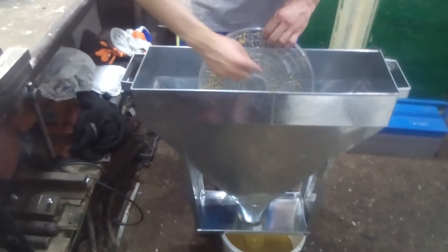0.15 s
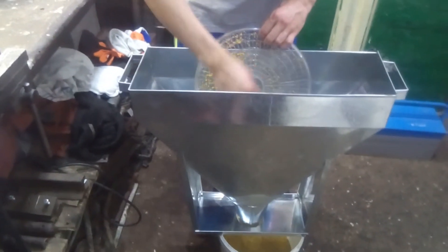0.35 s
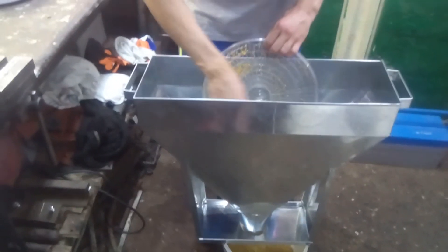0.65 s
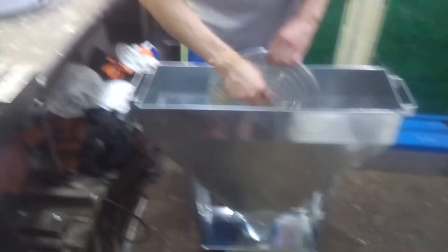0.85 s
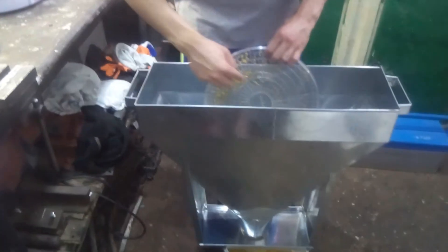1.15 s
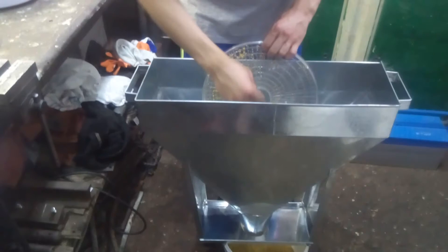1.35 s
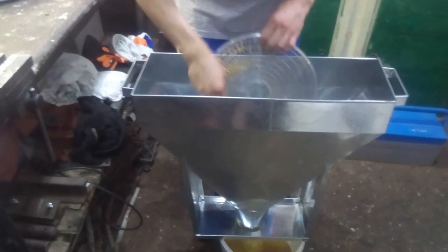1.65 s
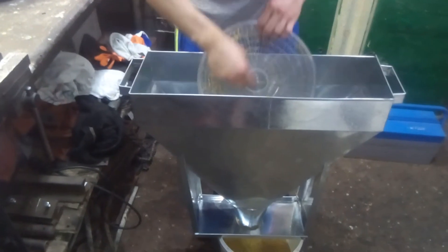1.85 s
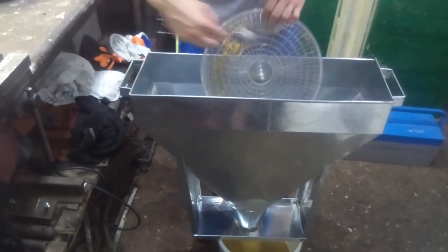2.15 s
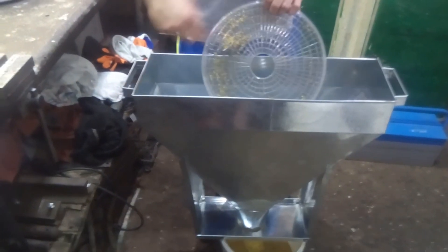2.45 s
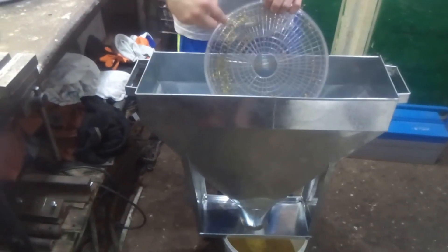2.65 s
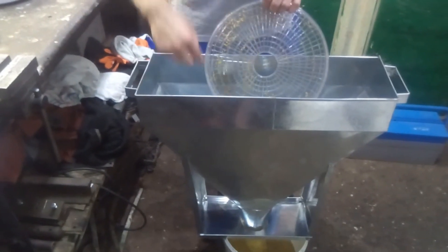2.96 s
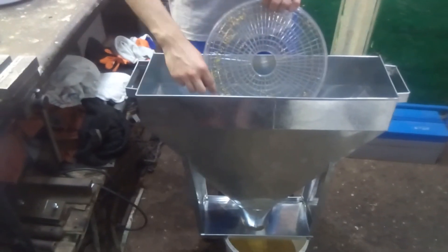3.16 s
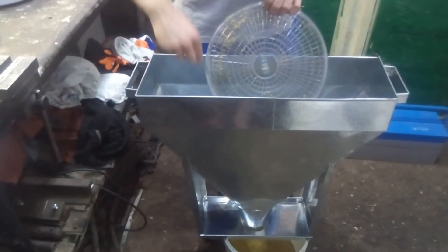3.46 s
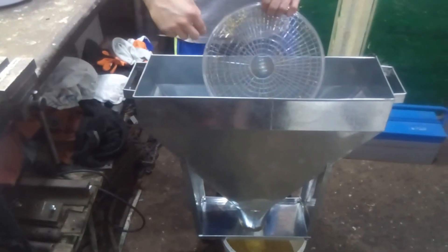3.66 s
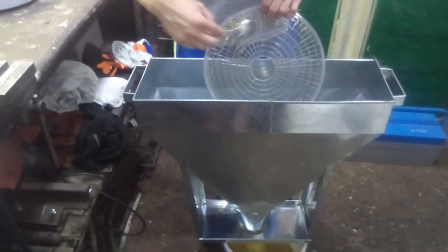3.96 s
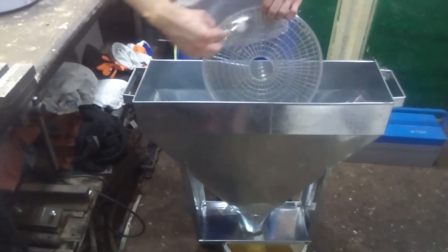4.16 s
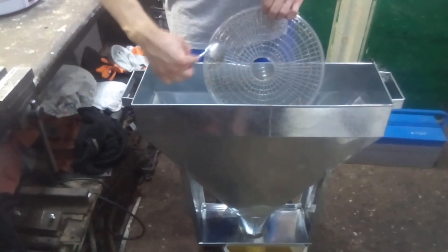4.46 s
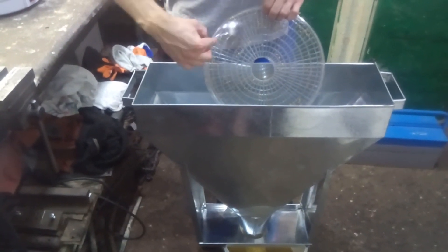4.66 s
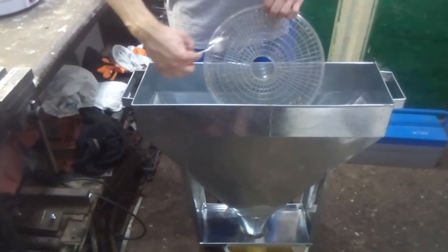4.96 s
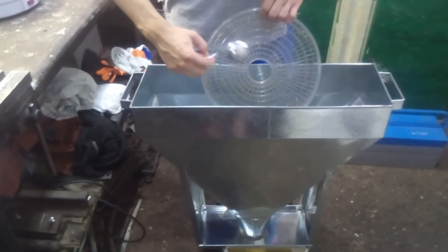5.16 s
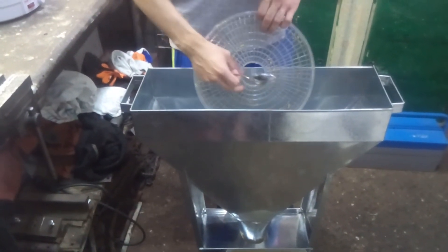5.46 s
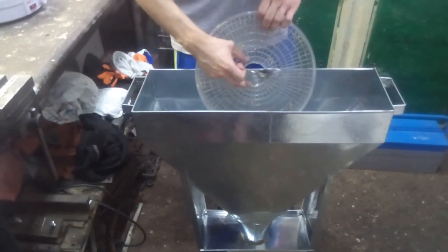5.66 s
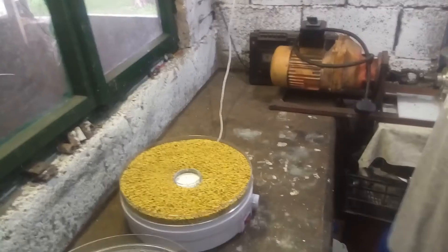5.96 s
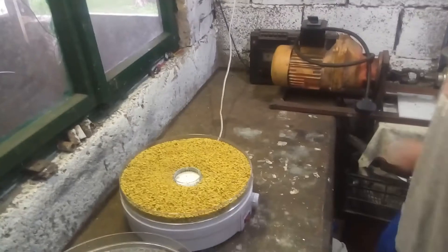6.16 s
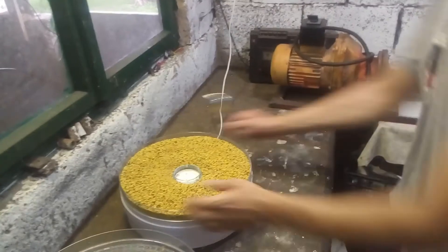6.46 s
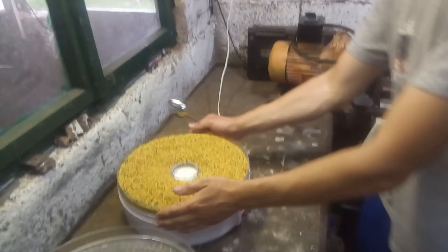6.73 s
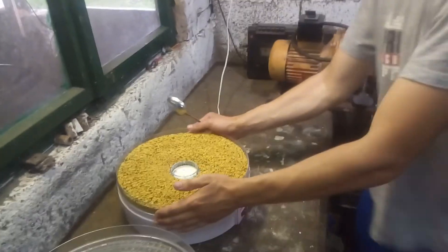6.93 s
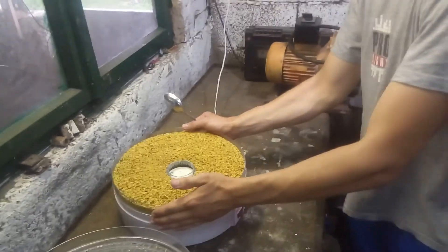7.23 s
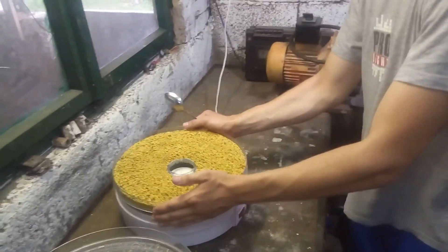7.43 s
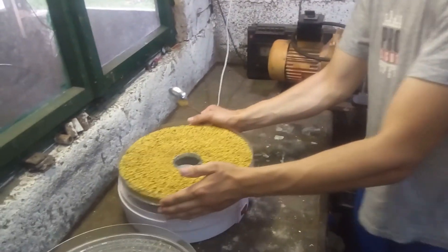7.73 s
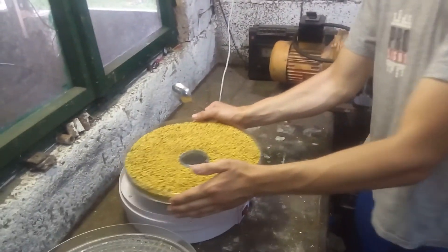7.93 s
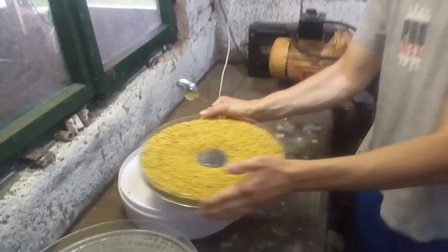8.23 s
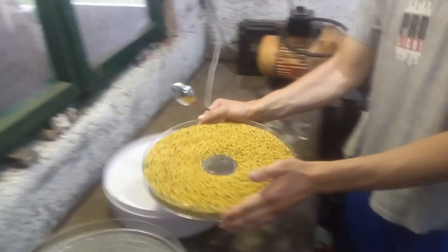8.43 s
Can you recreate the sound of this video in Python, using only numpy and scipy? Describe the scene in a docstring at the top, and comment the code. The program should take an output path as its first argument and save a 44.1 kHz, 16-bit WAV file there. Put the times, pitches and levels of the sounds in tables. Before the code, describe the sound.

Dry pellets scraped off a plastic tray hiss and rattle into a sheet-metal hopper, then an abrupt cut to a spoon clacking on a bench.

```python
"""Pellets into a hopper, then a spoon dropped in a shed

Random tiny impacts excite sheet-metal resonances: dry pellets, scraped off a plastic tray, pour in surges.
After a cut, decaying noise bursts and struck modes make a spoon dropped on a bench; filtered friction noise
makes hands on a stack of trays; pulsed tone makes a cricket on the left; an exponential wash gives the shed.
Steady hiss and a thin left-hand whine, jumping in pitch, run throughout; two spaced microphones differ in colour."""
import sys
import numpy as np
from scipy import signal
from scipy.fft import rfft, irfft
from scipy.io import wavfile
from scipy.ndimage import uniform_filter1d

SR = 44100
rng = np.random.default_rng(int(sys.argv[2]) if len(sys.argv) > 2 else 0)


def level_to_linear(level):
    """Convert decibel levels to linear amplitude factors, elementwise."""
    exponent = np.asarray(level, float) / 20
    return 10 ** exponent


def inscribe(sig):
    """Save sig as 16-bit PCM at rate SR to the path in sys.argv[1].

    A 1-D sig is mono; a 2-D sig holds one channel per row.
    Samples are clipped to [-1, 1] before scaling.
    """
    pcm = np.round(np.clip(np.atleast_2d(sig).T, -1, 1) * 32767)
    wavfile.write(sys.argv[1], SR, pcm.astype(np.int16))


N = 378802


def rms_one(x):
    """Normalization: scale a signal to unit root-mean-square."""
    return x / np.sqrt(np.mean(x ** 2) + 1e-20)


def at_hz(points, hz, axis=1):
    """Logarithmic frequency scale: interpolate a column of a table along log frequency."""
    return np.interp(np.log(hz), np.log(np.array(points)[:, 0]), np.array(points)[:, axis])


def colour(x, points, axis=1):
    """Minimum-phase filtering: a folded cepstrum gives a causal response that follows a dB table."""
    size = 4096
    hz = np.arange(1, size // 2 + 2) * SR / size
    cepstrum = irfft(np.log(level_to_linear(at_hz(points, hz, axis))))
    cepstrum[1:size // 2] *= 2
    cepstrum[size // 2 + 1:] = 0
    impulse_response = irfft(np.exp(rfft(cepstrum)))
    return signal.oaconvolve(x, impulse_response)[:N]


# Band limits [Hz]
BAND_EDGES = [30, 120, 250, 500, 1000, 1800, 2800, 4000, 5500, 7500, 10000, 13000, 19000]


def split(x):
    """Complementary band splitting: yield (centre [Hz], band); the bands sum to the input less its top."""
    for low, high in zip(BAND_EDGES, BAND_EDGES[1:]):
        rest = signal.sosfilt(signal.butter(2, high, "high", fs=SR, output="sos"), x)
        yield np.sqrt(low * high), x - rest
        x = rest


def drift(rate_hz):
    """Low-pass random process: noise through a double pole at rate_hz, with unit rms."""
    step = 40   # samples between computed values
    r = np.exp(-2 * np.pi * rate_hz * step / SR)
    noise = rng.standard_normal(N // step + 2002)
    slow = signal.lfilter([1], [1, -2 * r, r * r], noise)[2000:]   # leave out the build-up
    return np.interp(np.arange(N) / step, np.arange(len(slow)), rms_one(slow))


def resonate(x, hz, width_hz):
    """Damped resonance: two poles, with gain 1 at the peak."""
    r = np.exp(-np.pi * width_hz / SR)
    poles = [1, -2 * r * np.cos(2 * np.pi * hz / SR), r * r]
    return signal.lfilter([(1 - r * r) / 2, 0, (r * r - 1) / 2], poles, x + 1e-18)


def strike(modes, hits, spread_db):
    """Modal superposition: every hit rings every mode with a random strength of its own."""
    out = np.zeros(N)
    at = [round(s * SR) for s, db in hits]
    for hz, level_db, t60_s in modes:
        clicks = np.zeros(N)
        clicks[at] = level_to_linear(np.array(hits)[:, 1] + level_db + rng.normal(0, spread_db, len(at)))
        r, w = level_to_linear(-60 / (t60_s * SR)), 2 * np.pi * hz / SR
        out += signal.lfilter([0, np.sin(w)], [1, -2 * r * np.cos(w), r * r], clicks + 1e-18)
    return out


# Response of the two microphones:
# (frequency [Hz], left relative level [dB], right relative level [dB])
MIC_COLOURS = [(60, -96.5, -97), (200, -91, -89.5), (630, -83.5, -85), (1400, -83, -79), (2500, -77, -76.5),
               (3800, -74, -75.5), (4180, -70.5, -73.5), (5450, -68.5, -74), (6490, -74, -72.5),
               (8050, -86, -82), (10280, -107.5, -74), (13700, -99, -80), (14240, -94, -76),
               (14800, -84, -71.5), (15900, -78, -76)]


def through_mics(pair):
    """Transducer response: each channel takes its microphone's colour, the loudest table point at 0 dB."""
    top = level_to_linear(-np.max(np.array(MIC_COLOURS)[:, 1:]))
    return top * np.array([colour(pair[0], MIC_COLOURS, axis=1), colour(pair[1], MIC_COLOURS, axis=2)])


# Likeness of left and right at the spaced microphones: (frequency [Hz], correlation [0 to 1])
STEREO_LIKENESS = [(60, 0.67), (150, 1), (380, 0.44), (950, 0.07), (2380, 0), (5980, 0)]


def spread(mid, side, hz):
    """Spatial correlation: left and right are as alike as the microphones' spacing allows."""
    alike = np.clip(at_hz(STEREO_LIKENESS, hz), 0, 1)
    return np.sqrt(1 + alike) * mid + np.sqrt(1 - alike) * side * [[1], [-1]]


# Reverberation time of the shed: (frequency [Hz], time to fall 60 dB [s])
SHED_T60 = [(100, 0.32), (260, 0.25), (700, 0.23), (1840, 0.21), (4850, 0.18), (12800, 0.18)]


def shed(pair):
    """Diffuse reverberation: noise swells for a few ms and dies exponentially by band, anew at each call."""
    t = np.arange(round(0.7 * SR)) / SR
    tail = 0
    for hz, (mid, side) in split(rng.standard_normal((2, len(t)))):
        tail = tail + spread(mid, side, hz) * level_to_linear(-60 * t / at_hz(SHED_T60, hz))
    tail = tail * (1 - np.exp(-t / 0.009)) * level_to_linear(-29.5)
    return signal.oaconvolve(pair.mean(0)[None], tail, axes=1)[:, :N]


# Steady air and hiss, before the shared rumble is added:
# (frequency [Hz], left density [dB per Hz], right density [dB per Hz])
FLOOR_SPECTRUM = [(30, -111, -114), (61, -86.5, -85.5), (198, -85, -85), (599, -93, -92),
                  (1370, -99, -99.5), (2500, -99, -101), (5200, -103, -106), (7200, -109, -108),
                  (8300, -118, -118), (13900, -114, -116), (14400, -100, -110), (15200, -106, -108),
                  (15600, -115, -118)]


def floor():
    """Stationary noise: air and hiss are independent at left and right, save for a shared deep rumble."""
    rumble = signal.lfilter(*signal.butter(1, 90, fs=SR), rng.standard_normal(N))
    noise = rng.standard_normal((2, N)) + 1.06 * rumble
    left, right = [colour(noise[k], FLOOR_SPECTRUM, axis=k + 1) for k in (0, 1)]
    return np.sqrt(SR / 2) * np.array([left, right])   # unit noise to unit density per Hz


# Time the whine stays up in each cycle, rounded to whole slots: (time [s], stay [slots])
WHINE_STAY = [(0, 2.5), (5.9, 2.), (6.1, 1.), (6.4, 1.), (6.6, 2.), (6.8, 1.), (7.1, 3.5), (7.5, 5.),
              (7.7, 5.), (7.85, 1.5), (8.6, 1.2)]
SLOT_S, FIRST_CYCLE_S = 0.01706, 0.0668
WHINE_UP_HZ, STRAY_SHARE = 14338, 0.08   # share of slots that are up at random


def whine(up_db, down_db):
    """Frequency-shift keying: a thin tone jumps a fifth up at each eight-slot cycle, and at times at random."""
    t = np.arange(N) / SR
    slot = np.floor((t - FIRST_CYCLE_S) / SLOT_S).astype(int)
    cycle_start_s = FIRST_CYCLE_S + slot // 8 * 8 * SLOT_S
    stay = np.round(np.interp(cycle_start_s, *np.transpose(WHINE_STAY)))
    stray = rng.random(N // 500)[slot - slot[0]] < STRAY_SHARE
    up = uniform_filter1d(((slot % 8 < stay) | stray) * 1., size=40)   # soften the jumps
    phase = 2 * np.pi * WHINE_UP_HZ * t + 0.35 * drift(60)
    return level_to_linear(up_db) * up * np.sin(phase) + level_to_linear(down_db) * (1 - up) * np.sin(phase * 2 / 3)


# Cricket chirps: (time of the last pulse [s], relative level [dB])
CRICKET_CHIRPS = [(6.038, -56), (6.327, -54), (6.626, -55.5), (6.996, -54), (7.377, -53.5), (7.681, -55),
                  (7.979, -55.5), (8.322, -60), (8.61, -58.5)]
# Pulses of a chirp, counted back from the last: (relative level [dB])
CHIRP_PULSES = [0.5, -0.5, -4.5, -10]
PULSE_GAP_S, CRICKET_HZ = 0.0358, 4730


def cricket():
    """Amplitude modulation: wing strokes pulse a nearly pure tone, growing through each chirp."""
    t, envelope = np.arange(N) / SR, np.zeros(N)
    for s, db in CRICKET_CHIRPS:
        for k, pulse_db in enumerate(CHIRP_PULSES):
            envelope += level_to_linear(db + pulse_db) * np.exp(-np.abs((t - s + k * PULSE_GAP_S) / 0.0115) ** 3)
    envelope *= level_to_linear(1.5 * drift(70))   # the wing's teeth are uneven
    waver = 0.7 * drift(50)   # phase [rad]
    tone = np.sin(2 * np.pi * CRICKET_HZ * t + waver)
    return envelope * tone * level_to_linear([[-2.5], [-13.]])   # stronger at left


# Hands touch the trays:
# (time [s], relative level [dB], centre [Hz], decay constant [s], left over right [dB])
HAND_TOUCHES = [(6.002, -52.5, 1290, 0.0082, 6), (6.725, -47, 1000, 0.0054, 3),
                (6.779, -40, 2700, 0.0031, 8), (6.799, -50.5, 996, 0.006, 8), (6.9, -54, 5500, .002, 3),
                (7.073, -42.5, 3000, 0.0042, 15), (7.079, -47.5, 2200, 0.0069, 13),
                (7.128, -58, 840, 0.006, 16)]
# Hands slide on the trays: (start [s], length [s], relative level [dB], centre [Hz])
HAND_SLIDES = [(5.99, .09, -61, 1800), (6.672, 0.28, -55, 2500), (6.779, 0.04, -45, 3500),
               (6.82, 0.13, -54, 3520), (6.99, 0.1, -54, 2200), (7.268, 0.09, -51, 1190),
               (7.286, .06, -47, 2380), (7.34, .06, -52, 2300), (7.437, 0.029, -44, 2400),
               (7.437, 0.018, -44.5, 3600), (8.09, .09, -57, 1270)]
# Spectrum of skin and plastic in contact: (frequency [Hz], relative level [dB])
SKIN_SPECTRUM = [(150, 24.5), (700, 23.5), (2000, 11), (5000, 2), (10000, 1)]


def touches():
    """Friction noise: a touch is a dying scuff, a slide a grainy swell, each broad with one soft resonance."""
    out = np.zeros((2, N))
    t = np.arange(round(0.12 * SR)) / SR
    for s, db, hz, decay_s, pan_db in HAND_TOUCHES:
        burst = rng.standard_normal(len(t)) * np.exp(-t / decay_s)
        band = signal.butter(2, [0.52 * hz, 2.7 * hz], "band", fs=SR, output="sos")
        scuff = 0.69 * signal.sosfilt(band, burst) + resonate(burst, hz, 0.6 * hz)
        start = round(s * SR)
        out[:, start:start + len(t)] += level_to_linear(db - 0.5 + pan_db / 2 * np.array([[1], [-1]])) * scuff
    grains = 0.8 + 2.2 * (rng.random(N) < 1500 / SR)   # skin sticks and slips, 1500 grains a second
    friction = rng.standard_normal((2, N)) * grains * level_to_linear(1.8 * drift(60))
    for s, length_s, db, hz in HAND_SLIDES:
        span = slice(round(s * SR), round((s + length_s) * SR))
        slide = friction[:, span] * np.hanning(span.stop - span.start) ** 0.23
        soft = resonate(resonate(slide, hz, 0.53 * hz), hz, 0.53 * hz)
        out[:, span] += level_to_linear(db + np.array([[2.5], [-2.5]])) * (0.17 * slide + 0.7 * soft)
    return np.array([colour(side, SKIN_SPECTRUM) for side in out])


# Spoon dropped on the bench, main hit and bounces: (time [s], relative level [dB])
SPOON_BOUNCES = [(6.1026, -5.5), (6.1046, -7.5), (6.1064, -9.5), (6.1097, -14.5), (6.1133, -13.5),
                 (6.1212, -16), (6.1335, -22.5), (6.1415, -23.5), (6.159, -26)]
# Spectrum of the blow on the bench: (frequency [Hz], relative level [dB])
BLOW_SPECTRUM = [(60, -7), (220, 18), (700, 11), (1150, 10.5), (1700, 13.5), (3500, 8.5), (5200, 7),
                 (6500, 0.5), (9000, -6.5), (15000, -14.5)]
# Modes of the bench and the spoon lying on it:
# (frequency [Hz], relative level [dB], time to fall 60 dB [s])
BENCH_MODES = [(58, -23, .4), (201, -26, 0.42), (280, -20.5, 0.22), (429, -25, 0.33), (912, -28.5, .25),
               (1469, -28, 0.17), (1782, -25.5, 0.17), (2369, -31, .2), (2939, -23, .18),
               (3531, -22, 0.136), (3960, -28, .2), (4690, -29, 0.206), (5140, -29, .2), (5570, -25, 0.16)]


def spoon_drop():
    """Impact excitation: contacts clatter, bench modes ring, and the walls return the first blow as a wash."""
    out = np.zeros((2, N))
    t = np.arange(round(0.03 * SR)) / SR
    envelope = np.exp(-t / 0.0035) * (1 - np.exp(-t / 0.00022))
    for s, db in SPOON_BOUNCES:
        # mostly unlike at the two microphones
        clatter = rng.standard_normal((2, len(t))) + 0.23 * rng.standard_normal(len(t))
        start = round(s * SR)
        out[:, start:start + len(t)] += level_to_linear(db) * clatter * envelope
    # a small object radiates no bass
    out = signal.sosfilt(signal.butter(2, 1600, "high", fs=SR, output="sos"), out)
    blow = np.zeros((1, N))
    blow[0, round(SPOON_BOUNCES[0][0] * SR)] = level_to_linear(14.0)
    thud = strike(BENCH_MODES, SPOON_BOUNCES, spread_db=4.5)
    thud = np.array([np.roll(thud, 10), thud])   # reaches the left microphone ten samples late
    bright = np.array([colour(side, BLOW_SPECTRUM) for side in out + shed(blow)])
    return bright * level_to_linear([[1.5], [-1.5]]) + thud


# The spoon bumps the tray: (time [s], relative level [dB])
TRAY_BUMPS = [(0.957, -50), (1.015, -44), (1.069, -39.5), (1.088, -40), (1.424, -48), (1.9948, -49),
              (2.025, -45), (2.069, -45.5), (2.1, -46), (2.162, -44), (2.225, -50), (2.262, -49)]
# Tray modes: (frequency [Hz], relative level [dB], time to fall 60 dB [s])
TRAY_MODES = [(1038, -2, 0.17), (1074, -6, 0.18), (1330, -9.5, 0.22), (1820, -15, 0.27)]
# The spoon's tip catches a rib of the tray: (time [s], relative level [dB])
RIB_CATCHES = [(5.602, -42), (5.613, -36), (5.632, -63)]
# Spoon modes: (frequency [Hz], relative level [dB], time to fall 60 dB [s])
SPOON_MODES = [(3600, -6, 0.13), (4470, -3.5, 0.19), (6530, -6., .1)]


def spoon_on_tray():
    """Modal response: bumps ring the tray, and catches on its rib ring the spoon."""
    bumps = strike(TRAY_MODES, TRAY_BUMPS, spread_db=3.5) * level_to_linear([[10.], [15.]])
    catches = strike(SPOON_MODES, RIB_CATCHES, spread_db=4.0) * level_to_linear([[1.5], [-1.5]])
    return bumps + catches


# The steady trickle off the tilted tray: (time [s], level [dB])
TRICKLE_LEVEL = [(0.0, -39), (0.2, -36.5), (0.45, -39), (0.8, -42), (1.1, -45), (1.9, -42.5), (2.1, -42.5),
                 (2.26, -44), (2.38, -52), (2.62, -50.5), (2.85, -44), (3.3, -39.5), (3.68, -41),
                 (3.795, -47), (3.9, -43), (4.5, -45.5), (4.63, -47), (4.75, -40.5), (5.07, -43.5),
                 (5.2, -49.5), (5.55, -52.5), (5.68, -53.5), (5.76, -70), (5.9, -65)]
# The spoon pushes a heap over the edge: (time of the crest [s], level [dB], fall constant [s])
FLOW_SURGES = [(0.17, -37.5, 0.039), (0.333, -38.5, 0.06), (0.59, -40.5, 0.053), (0.813, -41, 0.024),
               (0.983, -42, 0.13), (1.198, -43, 0.059), (1.299, -42, 0.036), (1.45, -39.5, 0.036),
               (1.527, -40, 0.018), (1.647, -40.5, .02), (1.707, -40.5, 0.019), (1.775, -42, 0.048),
               (1.964, -43, 0.026), (2.498, -47, 0.016), (2.653, -50, .02), (2.72, -46, 0.019),
               (3.04, -42, 0.015), (3.137, -44, 0.033), (3.51, -41.5, 0.092), (3.854, -41, 0.042),
               (3.98, -39.5, 0.037), (4.092, -42.5, 0.06), (4.218, -45.5, 0.018), (4.31, -44.5, 0.018),
               (4.568, -46, 0.014), (4.934, -39.5, 0.072), (5.128, -41.5, 0.025), (5.39, -45.5, 0.062),
               (5.49, -49.5, 0.017), (5.55, -49.5, 0.013), (5.629, -43.5, 0.021), (5.734, -57.5, 0.031),
               (5.822, -57, 0.018), (5.895, -54.5, 0.012)]
RISE_SHARE = 0.82   # a surge rises in this share of the time it takes to fall


def flow():
    """Power addition of incoherent sources: shower level [dB] from the trickle plus every surge."""
    t = np.arange(0, N + 50, 50) / SR
    power = level_to_linear(2 * np.interp(t, *np.transpose(TRICKLE_LEVEL)))
    for s, db, fall_s in FLOW_SURGES:
        width_s = fall_s * np.where(t < s, RISE_SHARE, 1)
        power = power + level_to_linear(2 * db) * np.exp(-((t - s) / width_s) ** 2)
    return np.interp(np.arange(N) / SR, t, 10 * np.log10(power))


def patter(per_s, level_db, q):
    """Lightly damped ringing: larger pellets bounce singly on the sheet, each pinging at one of 24 pitches."""
    sizes = level_to_linear(3.0 * np.minimum(rng.exponential(1, (2, N)), 3))
    clicks = (rng.random((2, N)) < per_s / SR) * sizes
    dealt, pitches = rng.integers(0, 24, (2, N)), np.geomspace(1100, 9000, 24)
    pings = sum(resonate(clicks * (dealt == k), hz, hz / q) / np.sqrt(hz) for k, hz in enumerate(pitches))
    return level_to_linear(level_db) * rms_one(pings)


# Hopper wall modes: (frequency [Hz], bandwidth [Hz], relative level [dB])
HOPPER_MODES = [(211, 12, 7), (275, 21, 6), (306.4, 9, 3.5), (446.7, 15, 5), (469, 3, 2), (538, 5.7, -1),
                (832, 16.4, 4.5), (874, 16, 4), (888.6, 10, 3.5), (1158, 21, -2), (1504, 5.6, 5.5),
                (1833, 7.2, 0.5)]


def hopper_walls(grains):
    """Forced resonance: impacts drive the sheet-metal modes, whose strengths drift independently."""
    return level_to_linear(2.0) * sum(level_to_linear(db + 2.7 * drift(2.9)) * resonate(grains, hz, width_hz)
                          for hz, width_hz, db in HOPPER_MODES)


WALL_LAG_S, WALL_FOLLOWS = 0.066, 0.81   # the walls answer late and swing less than the flow
# dB of extra treble per dB of flow, and per dB that the flow runs ahead of the walls
FINE_BRIGHTENS, FINE_LEADS = 0.06, 0.12


def pellets(per_s, size_db, blur, patchy_db):
    """Shot noise: clumped tiny impacts, partly blurred by the hopper's echoes, ring its walls along."""
    flow_db = flow()
    r = np.exp(-1 / (WALL_LAG_S * SR))
    lagged_db = signal.lfilter([1 - r], [1, -r], flow_db - flow_db[0]) + flow_db[0]
    body_db = WALL_FOLLOWS * lagged_db - flow_db
    fine_db = FINE_BRIGHTENS * flow_db + FINE_LEADS * (flow_db - lagged_db)
    fine_db = fine_db + 1.64 * drift(30) + 0.74 * drift(7.2)   # the treble comes in spurts

    lands = rng.random((2, N)) < per_s * level_to_linear(2.2 * drift(30)) / SR
    sizes = level_to_linear(size_db * np.minimum(rng.exponential(1, (2, N)), 5)) * rng.choice([-1, 1], (2, N))
    grains = rms_one(lands * sizes) + blur * rng.standard_normal((2, N))
    grains = grains + hopper_walls(grains)
    grains = grains + patter(per_s=2500, level_db=-7.0, q=80.0)

    out = 0
    for hz, (mid, side) in split(grains):
        tilt_db = (hz > 7500) * (fine_db - np.median(fine_db))
        flicker_db = (patchy_db + 1.4 * (hz > 13000)) * drift(13.4)
        out = out + level_to_linear(tilt_db + flicker_db) * spread(mid, side, hz)
    out = through_mics(out)
    for edge_hz in (1500, 2800):   # the lows follow the walls fully, the low mids half-way
        low = signal.sosfiltfilt(signal.butter(3, edge_hz, fs=SR, output="sos"), out)
        out = out + low * (level_to_linear((body_db - np.median(body_db)) / 2) - 1)
    # the flow level is that of the strongest octave
    core = signal.sosfilt(signal.butter(4, [3500, 7000], "band", fs=SR, output="sos"), out.mean(0))
    return level_to_linear(flow_db) * out / np.std(core)


CUT_S = 5.907   # the hopper stops here


def scene():
    """Linear superposition: the hopper up to the cut, the bench and its room after it, the floor throughout."""
    hands, insect = touches(), cricket()
    insect = insect + level_to_linear(-6) * shed(insect)
    bench = through_mics(spoon_drop() + hands + shed(hands)) + insect
    shower = pellets(per_s=6000, size_db=3.0, blur=0.85, patchy_db=0.4)
    hopper = (shower + through_mics(spoon_on_tray())) * (np.arange(N) / SR < CUT_S)
    return hopper + bench + floor()


def band_limit(x):
    """A steep low-pass at the top of the band."""
    return signal.sosfilt(signal.butter(12, 16810, fs=SR, output="sos"), x)


def record(dry):
    """Band limiting: the whine leaks in at left, the right lags two samples, rumble and the top are cut."""
    wet = dry + whine(up_db=-59.5, down_db=-77.0) * [[1], [0]]
    wet[1, 2:] = wet[1, :-2].copy()
    wet = signal.sosfilt(signal.butter(2, 40, "high", fs=SR, output="sos"), wet)
    wet = signal.sosfilt(signal.ellip(12, 0.5, 60, 15600, fs=SR, output="sos"), wet)
    return band_limit(wet)


dry = scene()
out = record(dry)
inscribe(out)
```